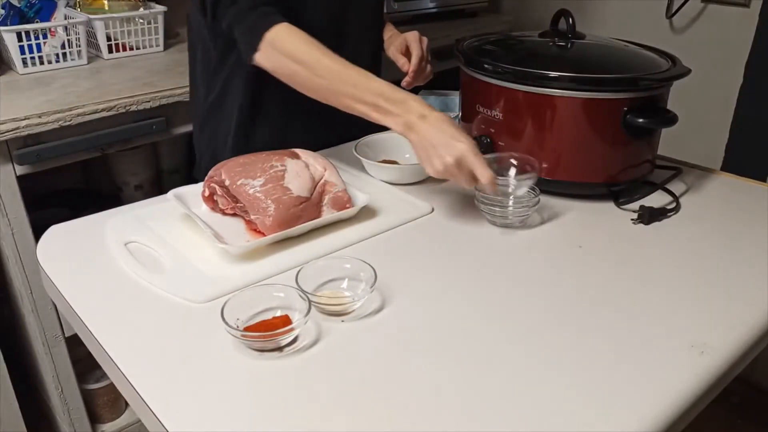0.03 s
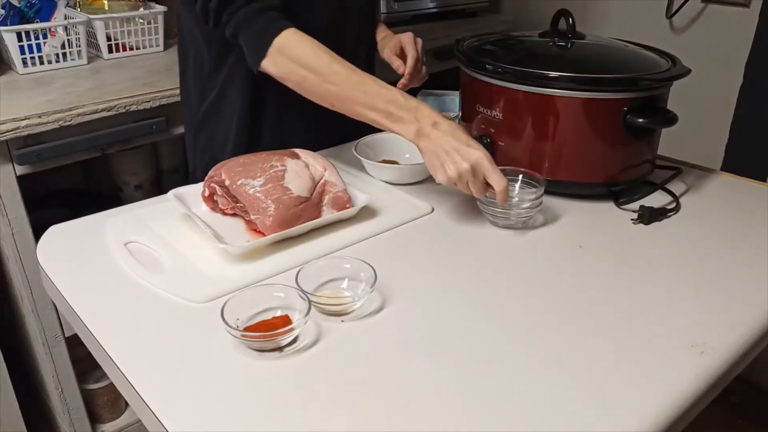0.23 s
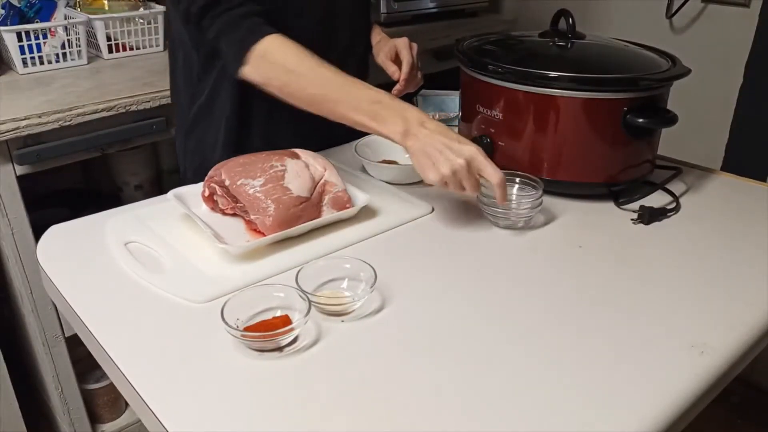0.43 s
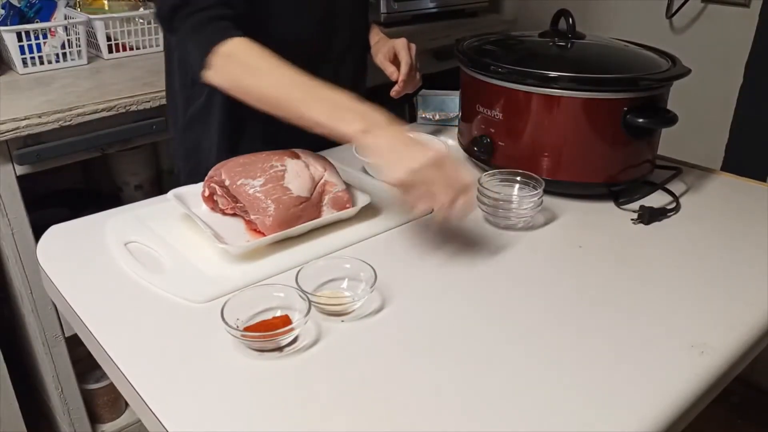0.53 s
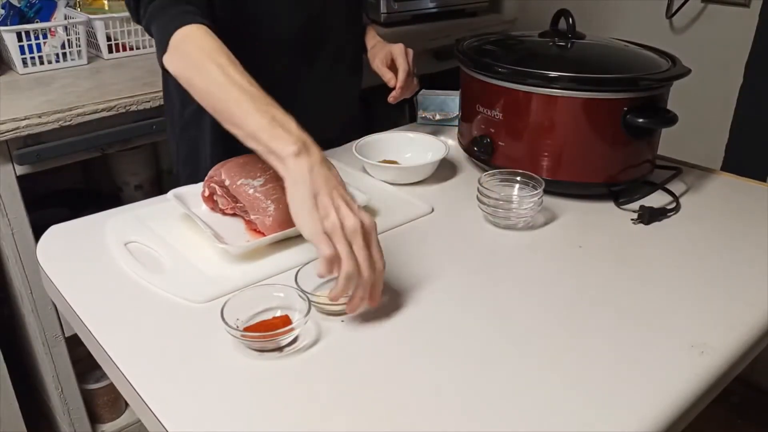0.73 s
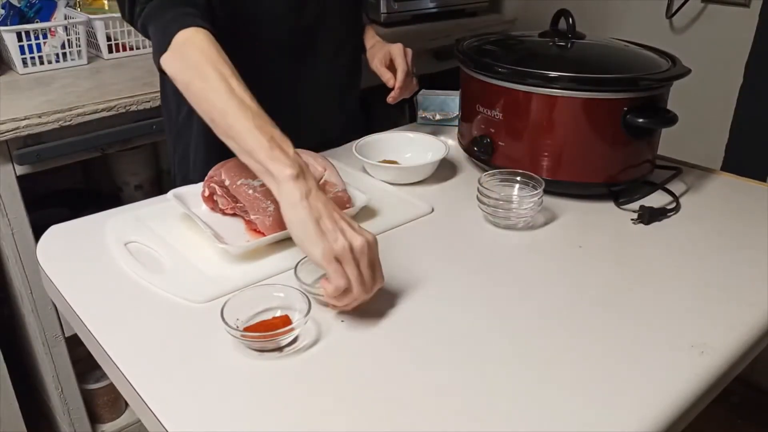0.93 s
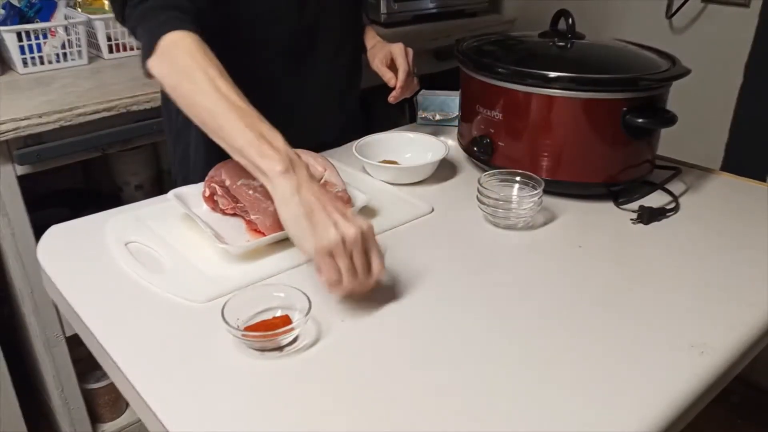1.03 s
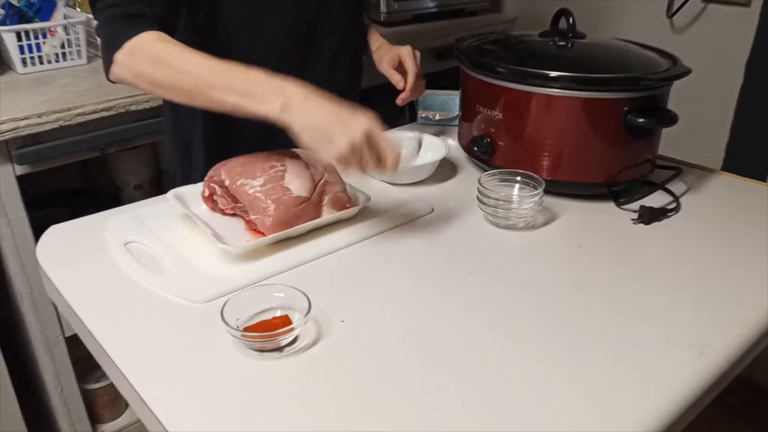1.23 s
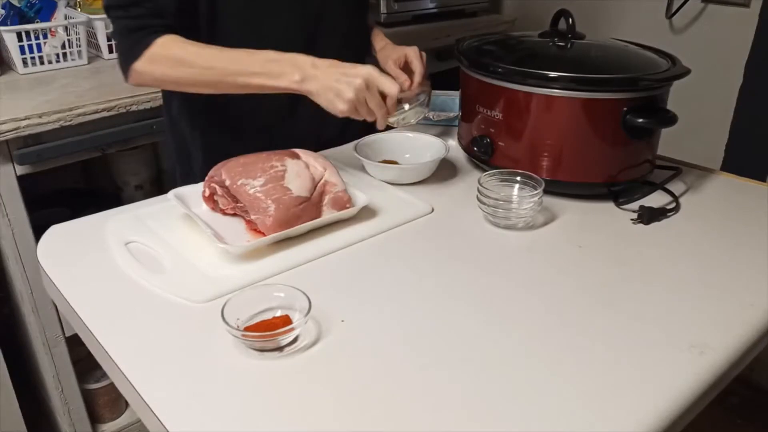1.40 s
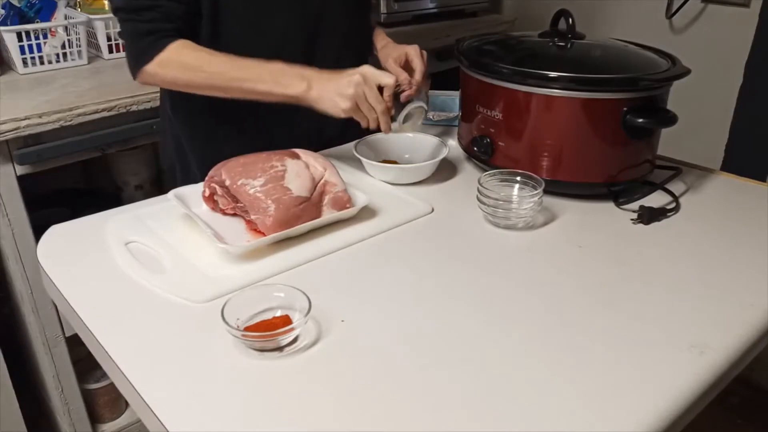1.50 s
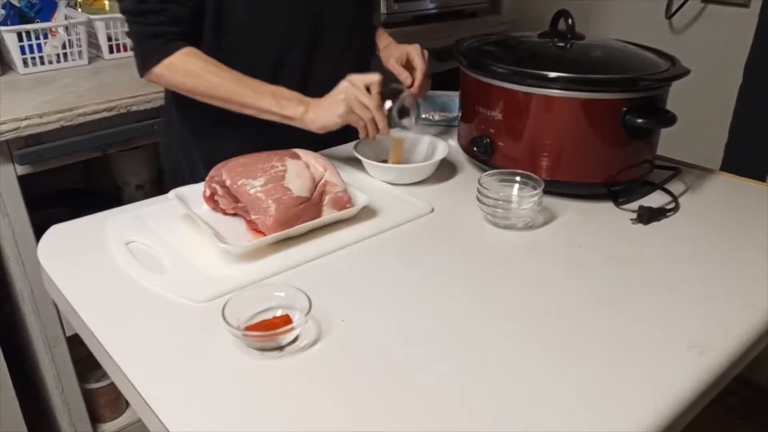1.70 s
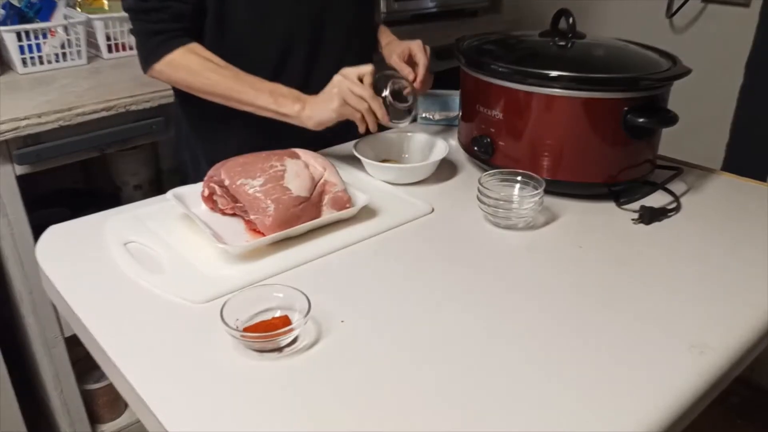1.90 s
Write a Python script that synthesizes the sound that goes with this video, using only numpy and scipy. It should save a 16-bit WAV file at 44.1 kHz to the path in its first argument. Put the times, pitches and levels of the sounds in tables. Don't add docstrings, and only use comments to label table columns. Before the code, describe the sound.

A small glass bowl clatters into a stack, rocks and settles with bright rings and hollow counter thumps; then light ticks, a brief scrape and a knock as another bowl is lifted, close in a small kitchen.

```python
import sys
import numpy as np
from scipy import signal
from scipy.fft import rfft, irfft, next_fast_len
from scipy.io import wavfile
from scipy.ndimage import uniform_filter1d, map_coordinates

SR = 44100
rng = np.random.default_rng(int(sys.argv[2]) if len(sys.argv) > 2 else 0)


def gain_from_db(level_db):
    decades = np.asarray(level_db, float) / 20
    return 10 ** decades


def store_wav(level_fs):
    pcm = np.round(np.clip(np.atleast_2d(level_fs), -1, 1) * 32767)
    wavfile.write(sys.argv[1], SR, pcm.T.astype(np.int16))


N = 85995


def unit(x):
    return x / np.sqrt(np.mean(x ** 2) + 1e-20)


def along(points, hz):
    point_hz, value = np.transpose(points)
    return np.interp(np.log(hz + 1), np.log(point_hz + 1), value)


def curve(rows, outside_db):
    s, db = np.transpose(rows)
    return np.interp(np.arange(N) / SR, s, db, left=outside_db, right=outside_db)


def wobble(rate):
    knots = rng.standard_normal(int(N * rate / SR) + 4)
    return map_coordinates(knots, [np.arange(N) * rate / SR])


def filtered(x, response):
    size = next_fast_len(len(x) + 8192)
    return irfft(rfft(x, size) * response(np.fft.rfftfreq(size, 1 / SR)), size)[:len(x)]


def coloured(size, spectrum):
    return unit(filtered(rng.standard_normal(size), lambda hz: gain_from_db(along(spectrum, hz))))


def puff(spectrum, t60, rise_s):
    t = np.arange(SR // 4) / SR
    return coloured(len(t), spectrum) * gain_from_db(-60 * t / t60) * (1 - np.exp(-t / rise_s))


def ring(modes, scatter_db, rise_s, detune=0., count=1, spread=0.96):
    t = np.arange(SR // 4) / SR
    hz, db, t60 = np.repeat(np.transpose(modes), count, axis=1)[:, :, None]
    size, pitch, phase = rng.standard_normal((3, len(hz), 1))
    swing = np.sin(2 * np.pi * (hz * (1 + detune * pitch) * t + spread * phase))
    partials = gain_from_db(db + scatter_db * size - 60 * t / t60) * swing
    return partials.sum(axis=0) * (1 - np.exp(-t / rise_s)) ** 2 / np.sqrt(count)


def grains(per_s, spread_db, size):
    chance, strength, side = rng.random((3, size))
    return (chance < per_s / SR) * gain_from_db(-spread_db * np.log(strength + 1e-9)) * np.sign(side - .5)


# pitch_hz, t60_s
ROOM_DECAY = [(150, 0.22), (400, 0.25), (900, 0.22), (3000, 0.21), (8000, 0.13), (14000, 0.046)]
WET_DB, WALL_S = -4.5, 0.0033


def room(x, wet_change_db=0):
    hz, t, z = signal.stft(rng.standard_normal(SR // 2), SR, nperseg=256)
    fading = z * gain_from_db(-60 * t / along(ROOM_DECAY, hz)[:, None])
    tail = signal.istft(fading, SR, nperseg=256)[1]
    tail = np.pad(tail / np.linalg.norm(tail), (round(WALL_S * SR), 0))
    return x + gain_from_db(WET_DB + wet_change_db) * signal.fftconvolve(x, tail)[:len(x)]


def add(out, s, x, wet_change_db=0):
    wet = room(np.pad(x, (0, SR // 4)), wet_change_db)
    start = round(s * SR)
    out[start:][:len(wet)] += wet[:len(out) - start]


# pitch_hz, level_db_per_hz
AIR = [(25, -12.5), (100, -8.5), (300, -11), (1000, -26), (6500, -36.5), (10000, -43.5), (13500, -46.5),
       (15300, -40)]
# pitch_hz, rms_db
HUM = [(60, -75), (119.5, -77.5), (268, -81.5), (360, -86.5)]
# start_s, level_db
HUM_LEVEL = [(.5, -0.5), (.7, -4.5), (1.2, -7), (1.35, 2)]
# start_s, level_db
WHINE = [
    (0, -85.5),
    (.7, -86),
    (1.17, -77),
    (1.195, -69.5),
    (1.25, -71),
    (1.32, -66),
    (1.375, -72.5),
    (1.39, -85),
    (1.95, -84),
]
AIR_DB, WHINE_HZ = -73, 917


def kitchen():
    t = np.arange(N) / SR
    air = gain_from_db(AIR_DB + 1.3 * wobble(6)) * coloured(N, AIR)
    hum = np.zeros(N)
    for hz, db in HUM:
        hum += gain_from_db(db + 3 + 1.8 * wobble(9)) * np.sin(2 * np.pi * hz * t + 0.33 * wobble(7))
    hum_level_db = np.interp(t, *np.transpose(HUM_LEVEL))
    whine_level = gain_from_db(curve(WHINE, -90) + 2 + 1.2 * wobble(42))
    whine = whine_level * np.sin(2 * np.pi * WHINE_HZ * t + .4 * wobble(7.5))
    return air + gain_from_db(hum_level_db) * hum + whine


# start_s, pitch_hz, level_db, t60_s
FAINT_RINGS = [(0.052, 9460, -78, 0.12), (1.048, 9500, -78.5, .05), (1.462, 9400, -61, 0.031),
               (1.461, 10090, -72.5, 0.04), (1.461, 14900, -76.5, .03), (1.704, 6300, -68, 0.09),
               (1.704, 3700, -80, 0.05), (1.704, 4740, -81, 0.21), (1.705, 8870, -80, 0.071),
               (1.705, 10000, -89, 0.022), (1.828, 3590, -75, 0.069), (1.847, 3396, -76.5, 0.1),
               (1.835, 2000, -78.5, 0.16), (1.853, 2030, -79.5, 0.066), (1.873, 2050, -72, 0.15)]
# start_s, level_db
CLICKS = [
    (1.463, -62.5),
    (1.705, -70),
]
# pitch_hz, level_db_per_hz
CLICK_COLOUR = [(1500, -34.5), (5000, -4), (9000, 5), (16000, 0)]


def faint_touches():
    out = np.zeros(N)
    for s, hz, db, t60 in FAINT_RINGS:
        add(out, s, ring([(hz, db, t60)], 2.7, 0.00025, detune=.012, count=3))
    for s, db in CLICKS:
        add(out, s, gain_from_db(db) * puff(CLICK_COLOUR, 0.0069, 0.00036), -8)
    return out


# start_s, level_db
TICKS = [
    (0.8355, -43),
    (.8405, -43.5),
    (0.8492, -50.5),
]
# pitch_hz, level_db, t60_s
HELD_BOWL = [(2385, 5, 0.023), (2446, 12.5, 0.033), (2840, -8.5, 0.074), (4620, 3, 0.023), (4980, 2, 0.076),
             (8120, 8, 0.028), (12300, -18, 0.025)]


def nail_ticks():
    out = np.zeros(N)
    for s, db in TICKS:
        add(out, s, gain_from_db(db - 11.5) * ring(HELD_BOWL, 0.82, 0.00048, 0.014, count=3))
    return out


# start_s, level_db
DRAG = [
    (.85, -61.5),
    (.862, -55),
    (.895, -50.5),
    (.915, -53),
    (.935, -46),
    (.955, -48),
    (.98, -53.5),
    (1.0, -63.5),
    (1.055, -71.5),
]
# pitch_hz, width_hz, level_db
FOOT = [(695, 42, 6), (940, 160, -3.5), (1762, 250, -10), (2417, 400, -21.5), (3300, 300, -29.5),
        (4250, 130, -29)]
# start_s, level_db
SLIP_S, SLIP_DB = (0.9595, -34)
DRAG_GRAINS_PER_S, DRAG_SPREAD_DB, DRAG_TOP_HZ = 4600, 3.5, 4500


def foot_response(hz):
    total = 0
    for k, (centre, width, db) in enumerate(FOOT):
        total = total + (-1) ** k * gain_from_db(db) * 1j * hz * width / (centre ** 2 - hz ** 2 + 1j * hz * width)
    return total / (1 + 1j * hz / DRAG_TOP_HZ) ** 2 * (1j * hz / (400 + 1j * hz)) ** 2


def foot_drag():
    out = np.zeros(N)
    scrape = unit(filtered(grains(DRAG_GRAINS_PER_S, DRAG_SPREAD_DB, N), foot_response))
    scrape = scrape / np.sqrt(np.abs(uniform_filter1d(scrape ** 2, size=700)) + .05)
    foot_modes = [(centre, db, 2.0 / width) for centre, width, db in FOOT]
    add(out, SLIP_S, gain_from_db(SLIP_DB) * ring(foot_modes, 0.96, 0.00076, spread=0))
    return out + room(gain_from_db(curve(DRAG, -120) + 2.0) * scrape)


# start_s, level_db
KNOCKS = [
    (1.058, -60),
    (1.0673, -27),
    (1.072, -30),
    (1.079, -34),
    (1.094, -38),
]
# pitch_hz, level_db, t60_s
BOARD = [(533.7, -3.5, 0.087), (709, -3, 0.089), (852, -1, 0.094), (1015, -2, 0.1), (1302, -0.5, 0.025),
         (1438, 3.5, 0.053), (1846, 9, 0.022), (2000, -17.5, .16), (2455, -1, 0.015), (2915, -12.5, 0.031),
         (3560, -15.5, 0.031), (5530, -32, 0.12)]
# pitch_hz, level_db_per_hz
KNOCK_PUFF = [(88, -45), (150, -23.5), (524, -1), (764, 1.5), (861, 3.5), (1110, -13.5), (2370, -24),
              (3110, -34), (9000, -58), (11700, -81.5), (19800, -120)]
# pitch_hz, level_db, t60_s
RAP = [(1315, -34, 0.042), (1815, -27.5, .03), (2415, -33, 0.016), (3220, -43.5, 0.014)]
RAP_S, PUFF_DB, PUFF_T60, KNOCK_WET_DB = 1.0675, -6, 0.1, -2.5


def lifting_knock():
    out = np.zeros(N)
    for s, db in KNOCKS:
        board = gain_from_db(db - 10) * ring(BOARD, 1.0, 0.0004, 0.026, count=3, spread=0.015)
        noise = gain_from_db(db + PUFF_DB) * puff(KNOCK_PUFF, PUFF_T60, 0.0017)
        add(out, s, board + noise, KNOCK_WET_DB)
    add(out, RAP_S, ring(RAP, 0, 0.00023, spread=0), KNOCK_WET_DB)
    return out


# pitch_hz, level_db_per_hz
SHUDDER = [(35, -28.5), (60, -4), (170, 6), (220, -5.5), (330, 0.5), (420, -30.5)]
SHUDDER_S, SHUDDER_LENGTH_S, SHUDDER_DB = 0.45, 0.11, -48


def counter_shudder():
    progress = np.clip((np.arange(N) / SR - SHUDDER_S) / SHUDDER_LENGTH_S, 0, 1)
    return gain_from_db(SHUDDER_DB) * np.sin(np.pi * progress) * coloured(N, SHUDDER)


# pitch_hz, level_db, t60_s
COUNTER = [(341, -13, 0.087), (427, -6, 0.069), (661, -1.5, .05), (694, -6, 0.035), (765, 3.5, 0.035),
           (860, -6, 0.06), (1000, -12, 0.026)]
# pitch_hz, level_db, t60_s
CABINET = [(166, -11, 0.1), (237.4, 1, 0.14)]


def counter_thud(boom_db):
    top = ring(COUNTER, 1.5, 0.00088, 0.016, spread=0.055)
    return top + gain_from_db(boom_db) * ring(CABINET, 1, 0.0033, spread=0)


# pitch_hz, level_db_per_hz
CLASH = [(180, -36.5), (300, -11), (877, -2), (1210, -7.5), (4240, -13), (7760, -8.5), (10500, -23),
         (16500, -37)]
CLASH_DB, CLASH_T60, CLASH_RISE_S = -7, 0.12, 0.0011
CHATTER_DB, CHATTER_PER_S, CHATTER_T60 = -17.5, 1500, .1
DETUNE, PARTNERS = .025, 5


def ringing_glass(modes):
    t = np.arange(SR // 4) / SR
    touches = grains(CHATTER_PER_S, 2.09, len(t)) * gain_from_db(CHATTER_DB - 60 * t / CHATTER_T60)
    touches[0] = 1
    bowls = ring(modes, 1.7, 0.00024) + gain_from_db(3.5) * ring(modes, 5.5, 0.0003, DETUNE, count=PARTNERS)
    rung = signal.fftconvolve(touches, bowls)[:len(t)]
    return gain_from_db(-13.0) * rung + gain_from_db(CLASH_DB) * puff(CLASH, CLASH_T60, CLASH_RISE_S)


# start_s, glass_db, crack_db, thud_db
LANDING = [
    (0.2361, -23, -25.5, -37.5),
    (.2408, -28, -34.5, -24),
    (.243, -34, -39.5, -30),
    (.251, -31.5, -40, -38.5),
    (0.2657, -25, -37.5, -35.5),
    (.276, -31, -39.5, -38.5),
    (.286, -31.5, -41.5, -36),
    (.293, -29.5, -37.5, -21),
    (.302, -33, -39, -22.5),
]
ROCKING = [
    (0.3823, -22, -25.5, -29),
    (0.387, -30.5, -37.5, -30.5),
    (0.412, -22, -19, -18.5),
    (.421, -30, -37.5, -31.5),
    (0.429, -29, -40, -29.5),
    (.439, -25.5, -34, -20.5),
    (.449, -32.5, -40, -29.5),
    (0.464, -30.5, -43.5, -25.5),
]
SETTLING = [
    (0.5557, -31.5, -25, -31.5),
    (.560, -35.5, -40, -18),
    (.5665, -39, -45, -32),
]
# pitch_hz, level_db, t60_s
LOOSE = [(1314, -12.5, 0.087), (1899, -15.5, .2), (3009, -9.5, 0.15), (4683, -9, 0.14), (6062, -11, .11),
         (7176, -12.5, .14), (7495, 2, 0.097), (7750, -5.5, 0.1), (8576, -9, .13), (9100, -14.5, .1),
         (11700, -15, .12), (12310, -20, .12), (13200, -22.5, .04), (15680, -26, .1)]
TILTED = [(1860, -10, 0.091), (2740, -12, 0.15), (3016, -18, 0.067), (4295, -7, 0.16), (5630, -7.5, 0.1),
          (6170, -13, .1), (6630, -10, .1), (7170, -8.5, 0.051), (7564, -2, 0.07), (7790, -5, 0.11),
          (9039, -14.5, 0.09), (11410, -11.5, 0.079), (12300, -16.5, .13), (15240, -25.5, .1)]
SEATED = [(1074, -21, 0.22), (1830, -8.5, 0.17), (2730, -14, 0.097), (3000, -33, 0.12), (4260, -9.5, 0.17),
          (4490, -11.5, 0.12), (5380, -10, 0.17), (6040, -25, 0.072), (7860, -10.5, 0.15),
          (8040, -12.5, 0.14), (8500, -9, 0.15), (12000, -12.5, 0.12), (12320, -16, 0.13)]
BOOM_DB = (3.5, 4.5, -1)
# pitch_hz, level_db_per_hz
CRACK = [(500, -19), (2000, 1), (9000, -1.5), (16500, -19)]
CRACK_T60, THUD_LOW_HZ = 0.014, 155
THUD_WET_DB = -3.5


def stack():
    out = np.zeros(N)
    stages = zip((LANDING, ROCKING, SETTLING), (LOOSE, TILTED, SEATED), BOOM_DB)
    for contacts, modes, boom_db in stages:
        for s, glass_db, crack_db, thud_db in contacts:
            add(out, s, gain_from_db(thud_db - 6.5) * counter_thud(boom_db), THUD_WET_DB)
            crack = gain_from_db(crack_db) * puff(CRACK, CRACK_T60, 0.00035)
            add(out, s, gain_from_db(glass_db) * ringing_glass(modes) + crack)
    out = filtered(out, lambda hz: (1j * hz / (THUD_LOW_HZ + 1j * hz)) ** 4)
    return out + counter_shudder()


# start_s, length_s, kept_bands_hz
THINNED = [
    (0.628, .028, (240, 640, 1095, 1830, 2740, 4400, 5400, 7740, 8380, 12320)),
    (1.69, 0.0074, (60, 260, 460, 700, 920, 1100, 6300)),
]
KEPT_WIDTH_HZ, FADE_S = 122, 0.0057


def thin_out(x):
    t = np.arange(N) / SR
    for s, length, bands_hz in THINNED:
        def bands(hz):
            passed = sum(1 / (1 + ((hz - centre) / KEPT_WIDTH_HZ) ** 6) for centre in bands_hz)
            return np.minimum(1, passed)
        share = np.clip(np.minimum(t - s, s + length - t) / FADE_S + .5, 0, 1)
        x = x + share * (filtered(x, bands) - x)
    return x


def scene():
    bowl_in_hand = nail_ticks() + foot_drag() + lifting_knock()
    return (kitchen() + faint_touches() + bowl_in_hand + stack())[None]


def band_limit(x):
    return signal.sosfilt(signal.butter(12, 16870, fs=SR, output="sos"), x)


DUCK_DB, DUCK_POWER, RECOVER_S, TOP_HZ = -52, 0.21, 0.25, 16850


def record(dry):
    keep = np.exp(-1 / (RECOVER_S * SR))
    power = signal.lfilter([1 - keep], [1, -keep], dry[0] ** 2)
    ducked = dry[0] * (1 + power / gain_from_db(2 * DUCK_DB)) ** (-DUCK_POWER / 2)
    mix = filtered(thin_out(ducked), lambda hz: hz < TOP_HZ)[None]
    return band_limit(mix)


dry = scene()
out = record(dry)
store_wav(out)
```